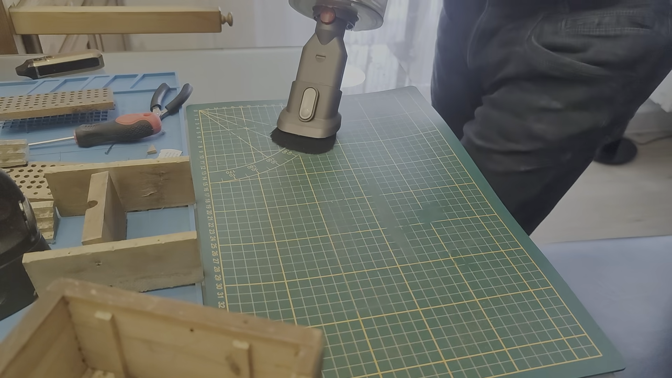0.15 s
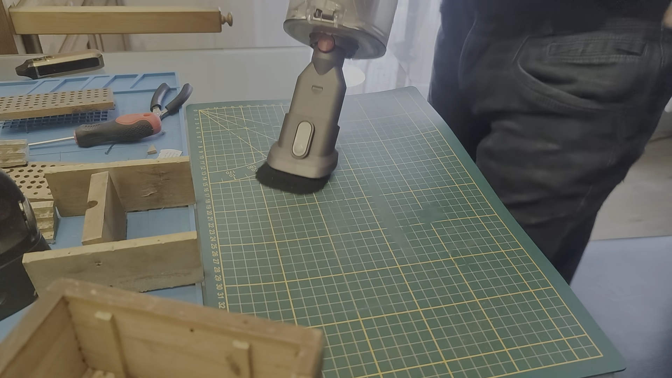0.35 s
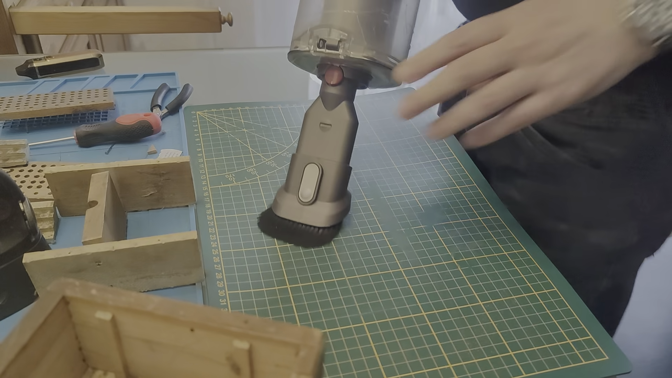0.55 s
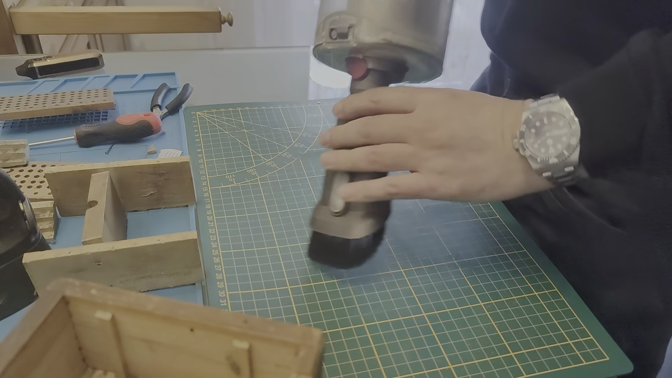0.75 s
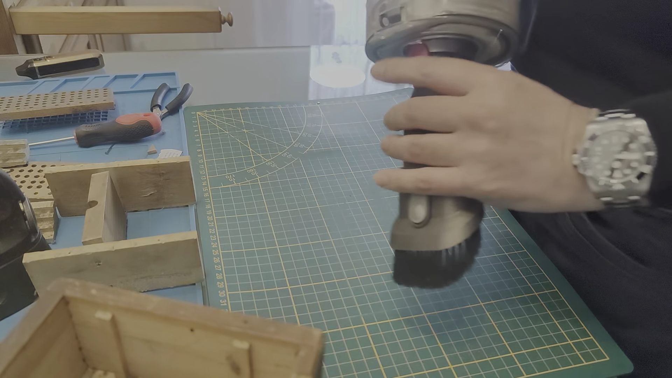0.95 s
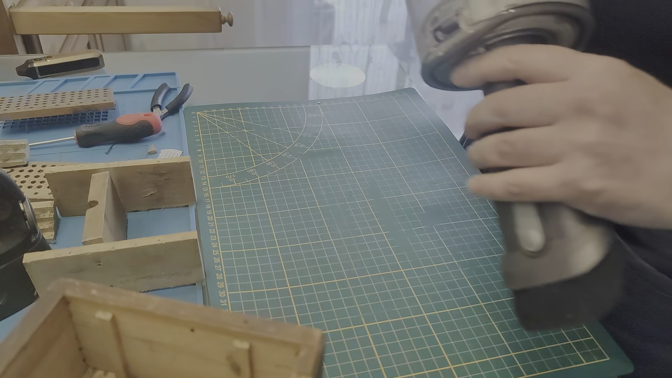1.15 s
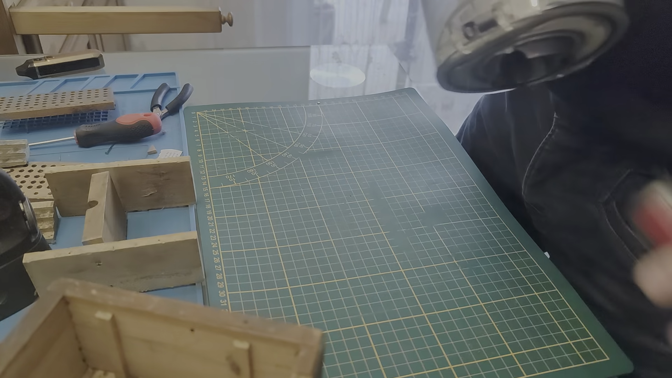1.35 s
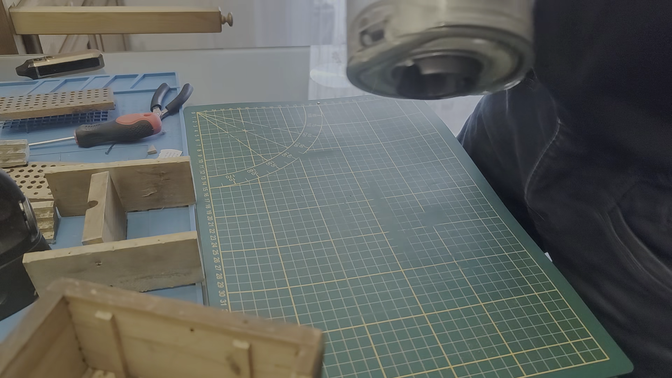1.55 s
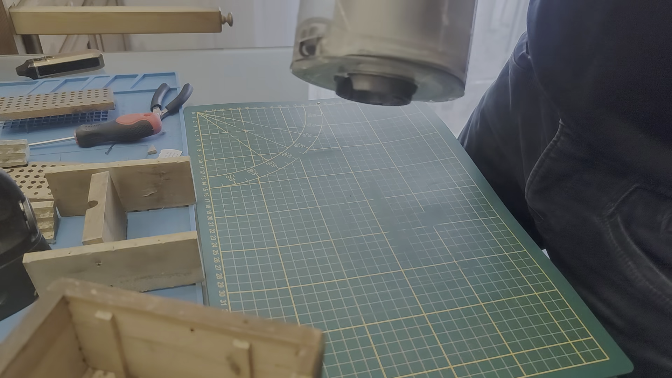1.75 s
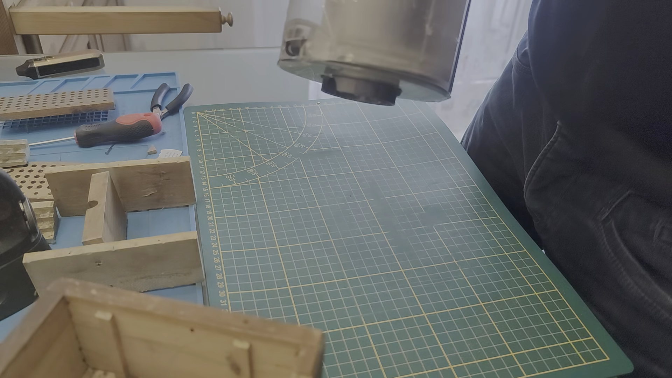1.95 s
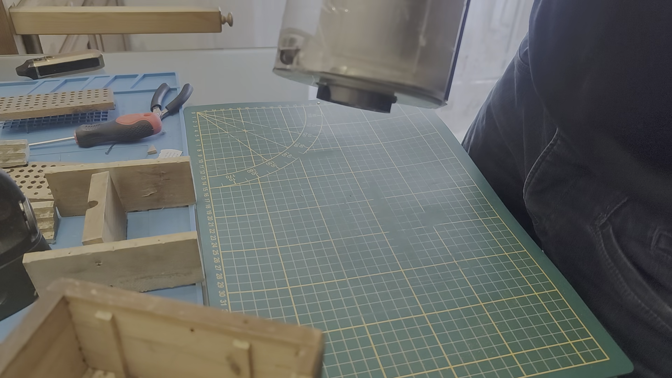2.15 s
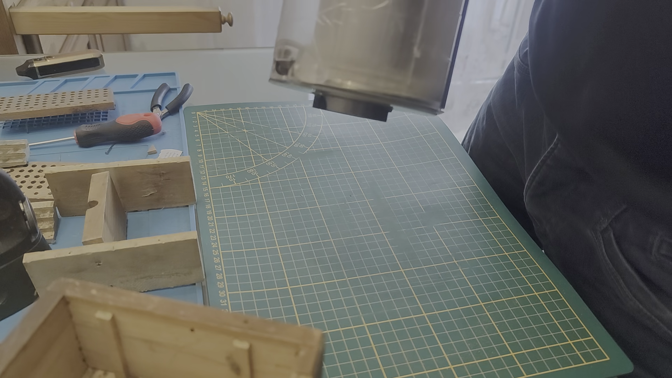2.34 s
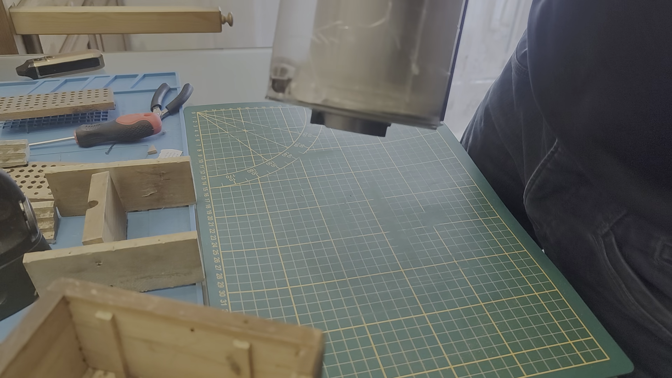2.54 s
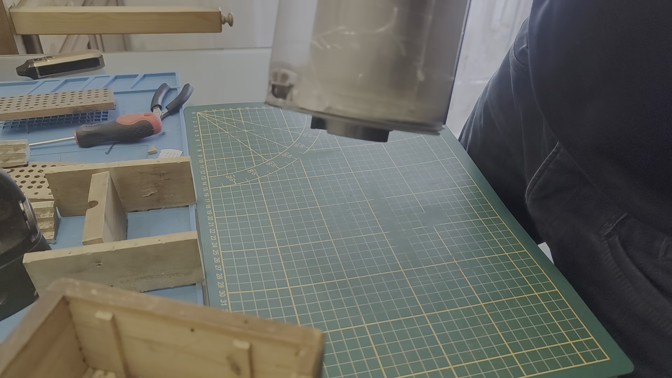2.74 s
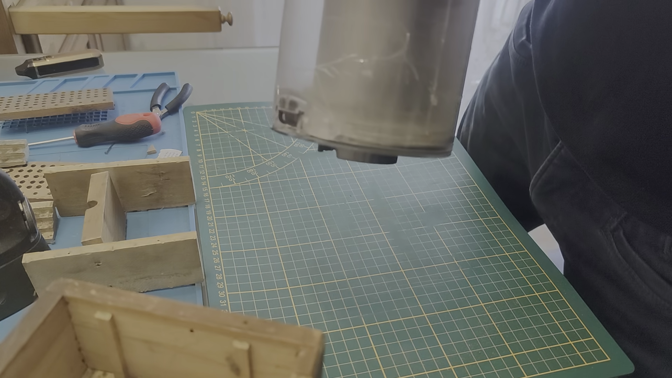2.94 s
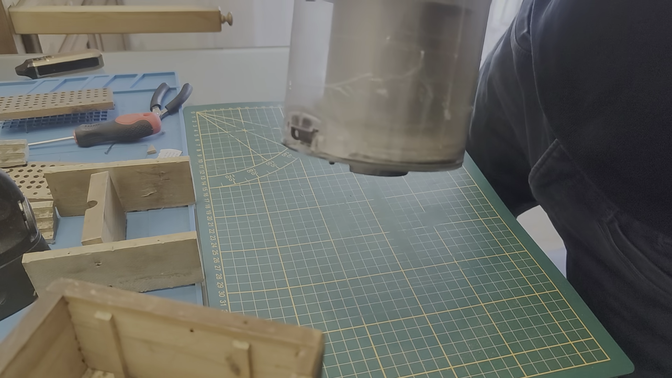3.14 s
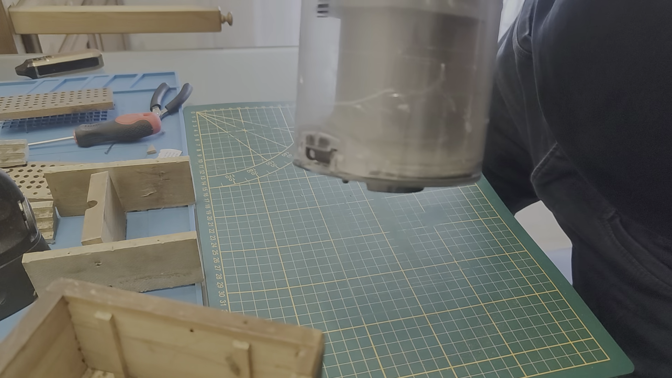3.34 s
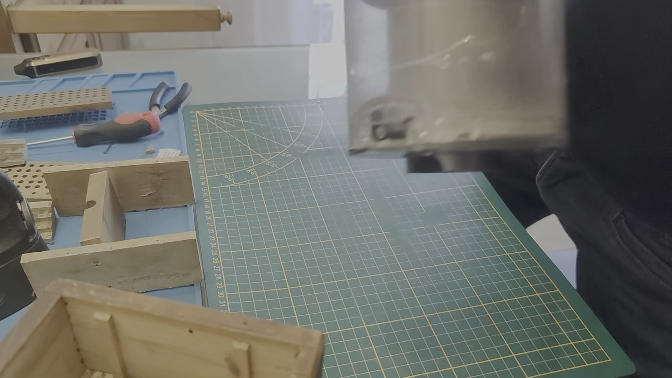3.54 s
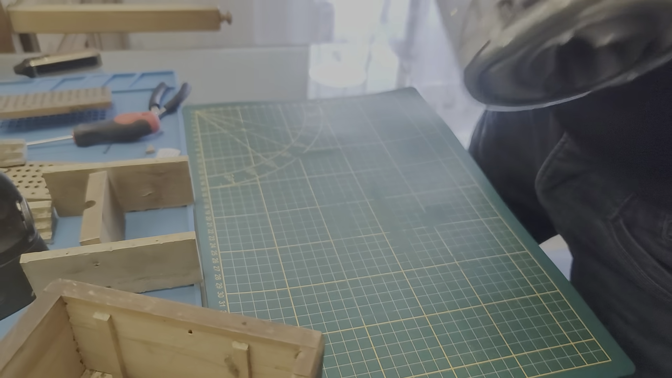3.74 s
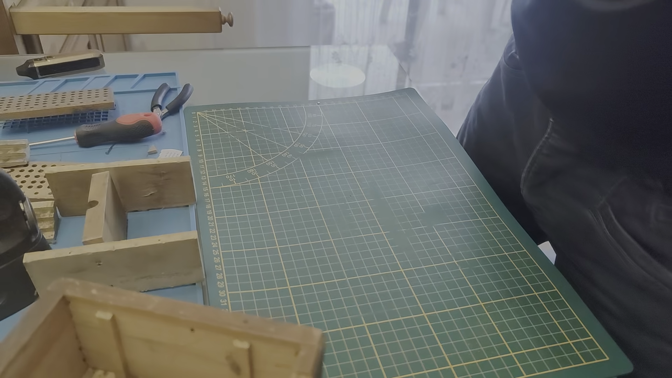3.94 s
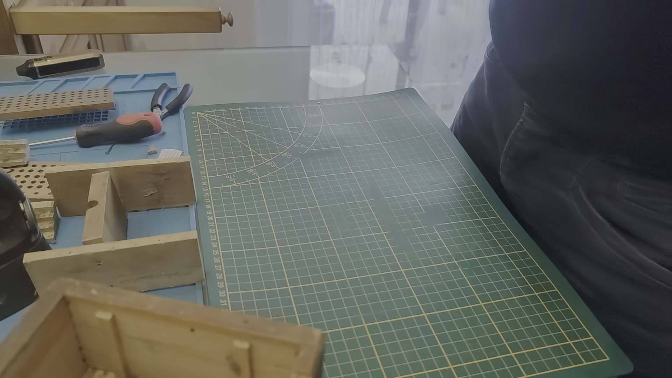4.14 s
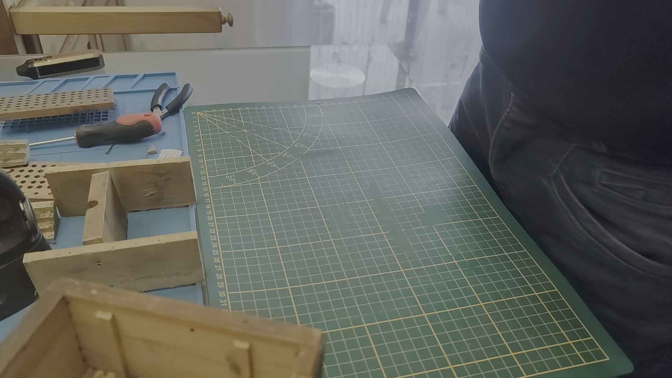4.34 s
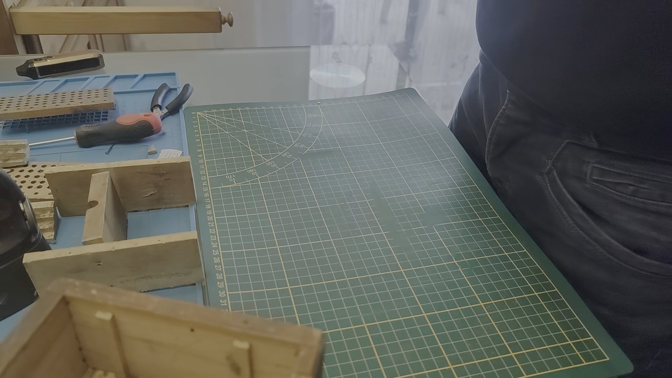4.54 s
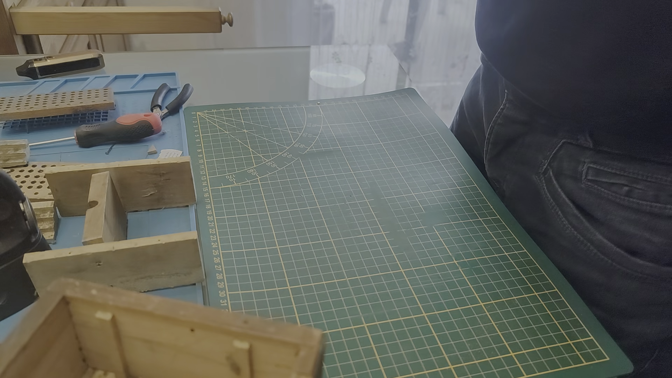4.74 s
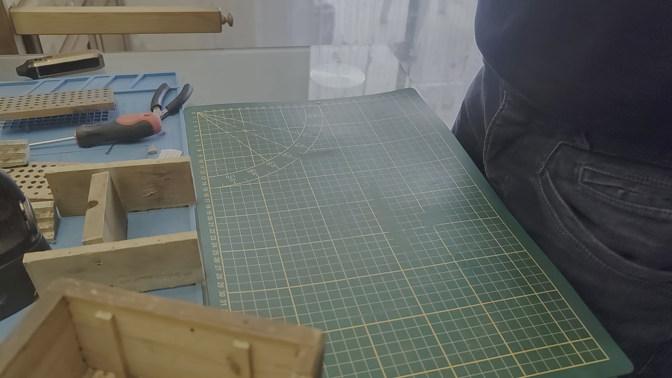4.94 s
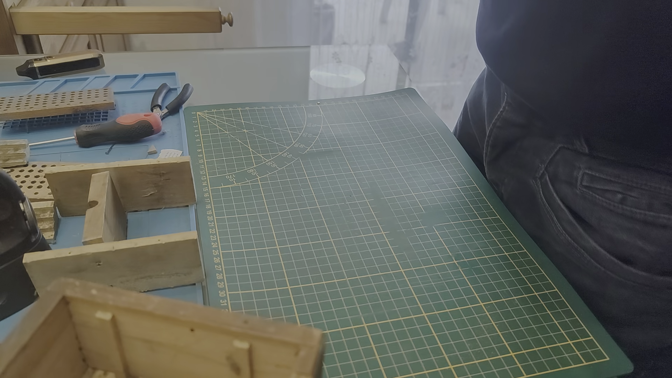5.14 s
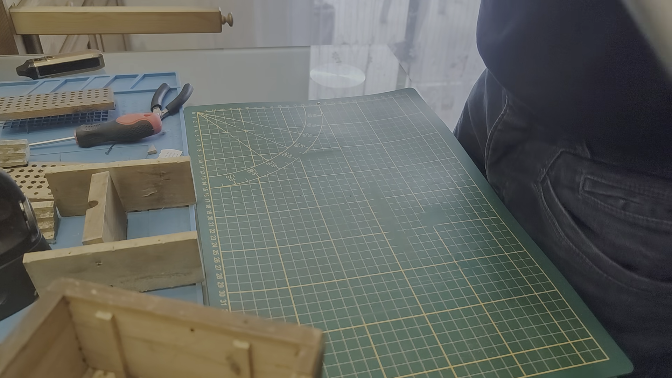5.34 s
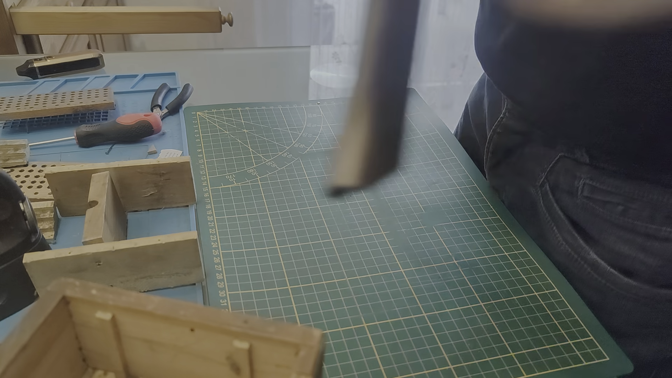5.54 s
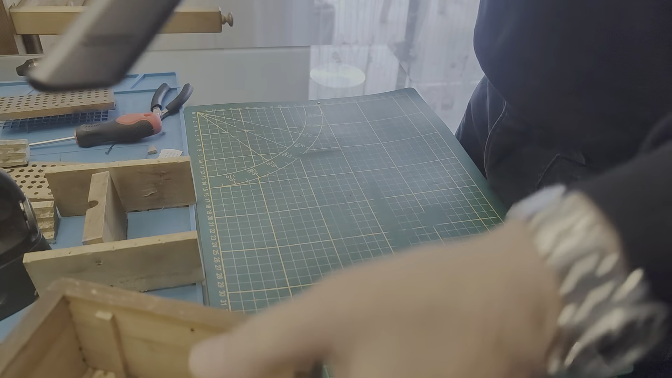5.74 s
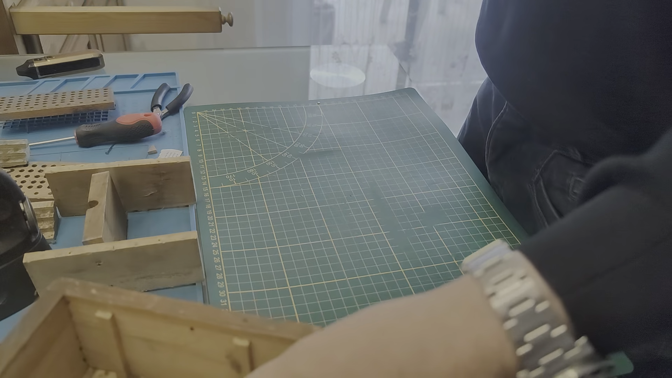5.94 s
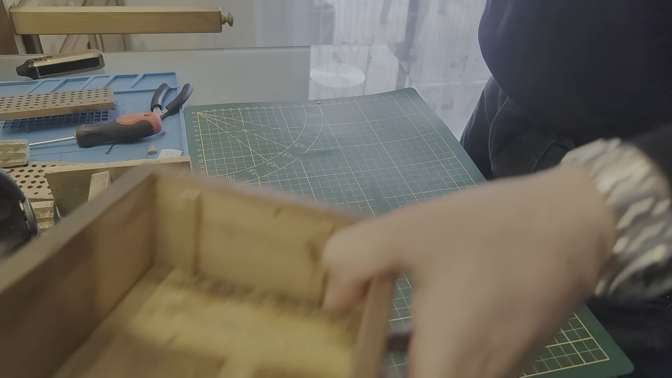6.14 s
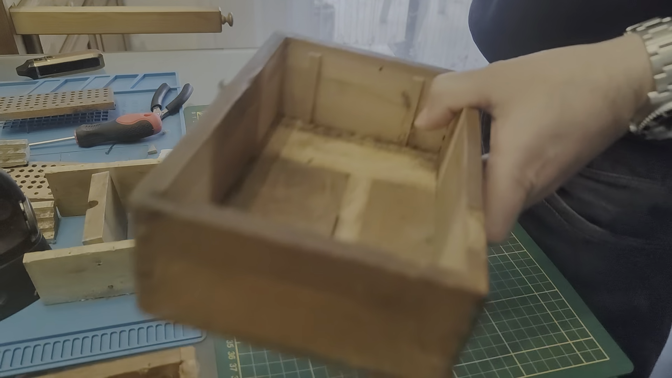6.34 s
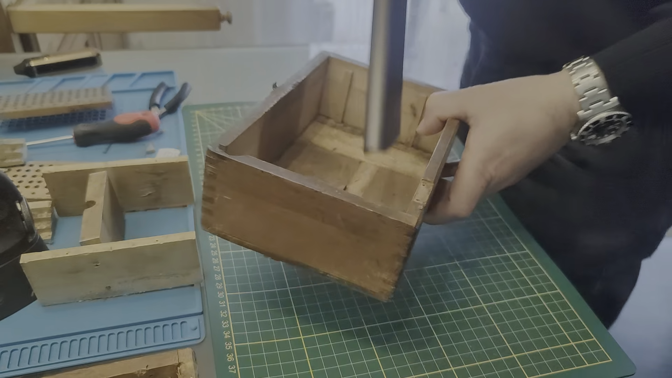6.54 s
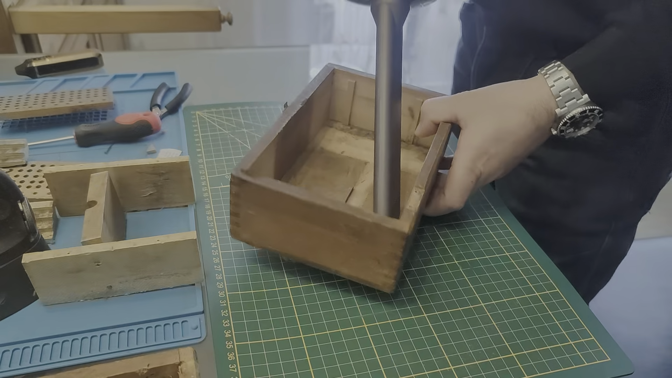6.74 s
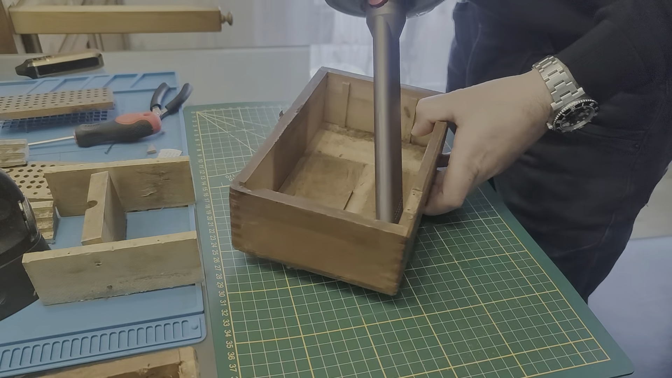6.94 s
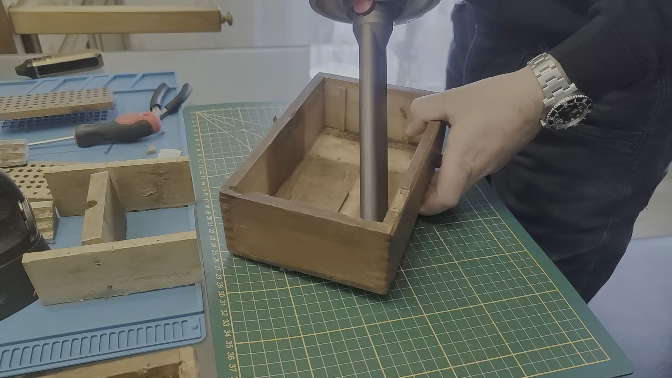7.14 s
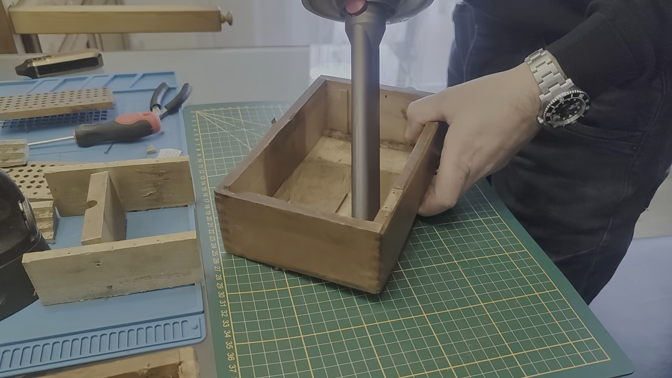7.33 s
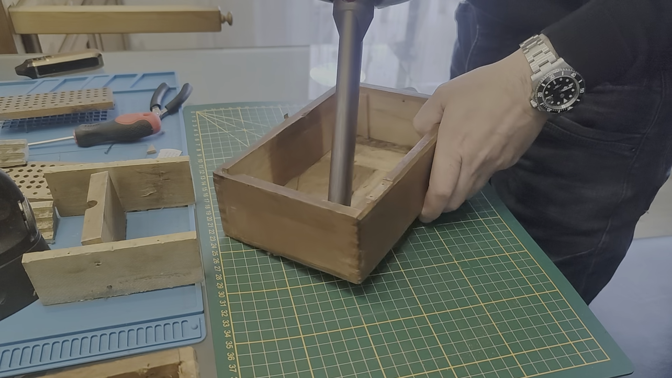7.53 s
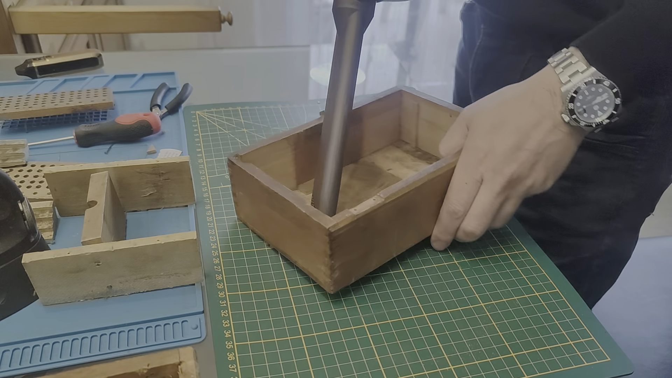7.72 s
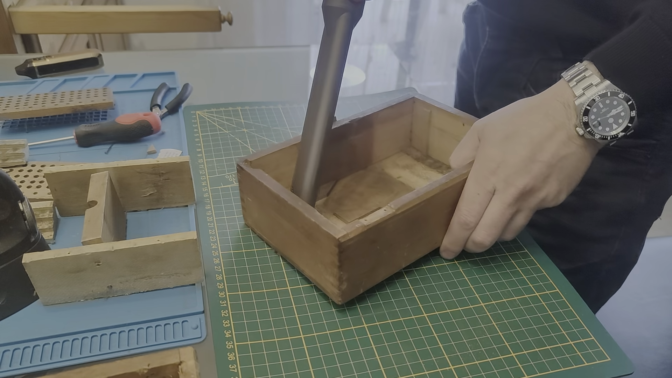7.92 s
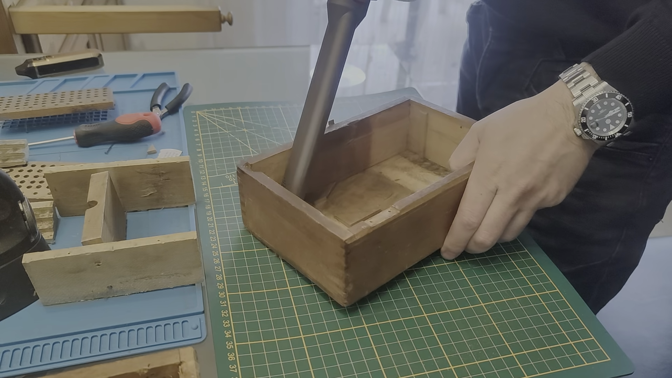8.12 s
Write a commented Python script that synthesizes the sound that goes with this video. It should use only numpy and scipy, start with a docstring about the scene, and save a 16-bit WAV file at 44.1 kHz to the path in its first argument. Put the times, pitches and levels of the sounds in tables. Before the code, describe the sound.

A handheld vacuum runs close by in a small room, with rushing air and a high whine. At about 0.7 seconds it switches off, falling quickly in pitch to a low hum that fades by 2.4 seconds. Hollow plastic knocks and a short scrape come as the brush is pulled off around 1.4 seconds, with louder knocks near 1.9, 2.5 and 3.3 seconds. A small flap rattles, dying away, between 2.6 and 3.2 seconds. From about 4 seconds, light plastic taps, dull bumps and rubbing lead to a loud, sharp snap at 5.3 seconds as a narrow nozzle locks in. Faint rustling and finger contacts follow, then a wooden box lands with a short knock at 6.8 seconds. Immediately the motor spins up with a rising whine, and air rushes and howls through the nozzle until the end, around 8 seconds.

```python
"""Hand vacuum tool change

A cordless hand vacuum runs over a workbench in a small room: air rushes through its duct, its impeller
whines. Switched off, it brakes and coasts with a low hum. The brush is pulled off, the hollow plastic
body is knocked about and a flap rocks. A crevice tool is picked up and snaps in, a wooden box is lifted
and set down, and the motor spins up again, air howling through the tool's slot."""
import sys
import numpy as np
from scipy import signal
from scipy.fft import rfft, irfft
from scipy.io import wavfile
from scipy.ndimage import uniform_filter1d

SR = 44100
rng = np.random.default_rng(int(sys.argv[2]) if len(sys.argv) > 2 else 0)


def put_to_file(sound):
    """Save the sound as 16-bit audio at rate SR, in the file named by the first command-line argument."""
    columns = np.atleast_2d(sound).T  # one column per channel
    safe = np.clip(columns, -1, 1)
    whole_steps = np.round(safe * 32767)
    wavfile.write(sys.argv[1], SR, whole_steps.astype(np.int16))


N = 360738
TIME, RING_TIME = np.arange(N) / SR, np.arange(SR // 2) / SR
HZ, FILTER_HZ = np.fft.rfftfreq(N, 1 / SR), np.fft.rfftfreq(2048, 1 / SR)

OFF_S, ON_S = 0.67, 6.87  # the trigger is released, then pulled again
BRUSH_HZ, CREVICE_HZ, COAST_HZ = 1168.5, 1172.8, 137.7  # shaft speed with each tool, and after braking

# Colour of friction, for rubbing and for the bearings: freq_hz, level_db
FRICTION_COLOUR = [(40, -2), (150, 2.5), (400, 5), (800, 4), (2000, 2.5), (4000, 2), (6500, -3),
                   (14000, -11)]


def amp(db):
    """Decibels to gain."""
    return 10 ** (np.asarray(db) / 20)


def unit_rms(x):
    """Scales to rms 1."""
    return x / np.sqrt(np.mean(x ** 2) + 1e-20)


def curve(points, hz, column=1):
    """One column of a table, joined on a log-frequency axis."""
    table = np.array(points, float)
    return np.interp(np.log(hz + 1), np.log(table[:, 0] + 1), table[:, column])


def automation(rows):
    """The columns of a table as curves in time."""
    times, *columns = np.transpose(rows)
    return [np.interp(TIME, times, column) for column in columns]


def add(mix, start_s, sound):
    """Mixes a sound in at start_s."""
    part = mix[..., round(start_s * SR):][..., :sound.shape[-1]]
    part += sound[..., :part.shape[-1]]


def wander(rate_hz):
    """Smooth random drift of rms 1."""
    return unit_rms(irfft(rfft(rng.standard_normal(N)) / (1 + (HZ / rate_hz) ** 4), N))


def paired(spectra, hz):
    """Makes two spectra alike in the bass, as two close microphone ports hear them."""
    # Likeness of left and right: freq_hz, correlation
    stereo_likeness = [(20, .75), (60, 0.86), (150, 0.86), (300, 0.79), (600, 0.7), (1000, 0.34),
                       (2000, 0.19), (4000, 0.082), (14000, 0)]
    alike = np.clip(curve(stereo_likeness, hz), -1, 1)
    return np.array([spectra[0], alike * spectra[0] + np.sqrt(1 - alike ** 2) * spectra[1]])


def noise(colour_db):
    """Stereo noise of rms 1 in the given colour."""
    return unit_rms(irfft(paired(rfft(rng.standard_normal((2, N))), HZ) * amp(colour_db), N))


def resonances(peaks):
    """Peaks and dips as a dB curve."""
    return sum(db / (1 + (2 * (HZ - hz) / width_hz) ** 2) for hz, width_hz, db in peaks)


def impulse_response(colour_db):
    """Minimum-phase filter for a dB curve."""
    cepstrum = irfft(np.log(amp(colour_db)))
    half = len(cepstrum) // 2
    cepstrum[1:half] *= 2
    cepstrum[half + 1:] = 0
    return irfft(np.exp(rfft(cepstrum)))


def decay(t60):
    """An envelope that falls 60 dB in t60 seconds."""
    return np.exp(-np.log(1000) * RING_TIME / t60)


def mode(hz, t60):
    """One dying sine."""
    return np.sin(2 * np.pi * hz * RING_TIME) * decay(t60)


def ringing(modes):
    """An object's modes, each with the energy of its level."""
    return sum(amp(db) * unit_rms(mode(hz, t60)) for hz, db, t60 in modes) / np.sqrt(len(RING_TIME))


def crack(t60, tick, swell_share=0.023):
    """A sharp tick and a burst of tiny contacts; long scuffs start more softly."""
    count = len(RING_TIME)
    white = rfft(rng.standard_normal((2, count)))
    burst = irfft(paired(white, np.fft.rfftfreq(count, 1 / SR)))
    burst *= (1 - np.exp(-RING_TIME / (swell_share * t60))) * decay(t60)
    burst /= np.linalg.norm(burst[0])
    burst[:, 0] += tick
    return burst / np.hypot(1, tick)


def room_tone():
    """The faint, bass-heavy bed of a still room."""
    # Colour of the bed: freq_hz, level_db
    bed_colour = [(20, 5.5), (90, 13.5), (220, 13), (400, 3.5), (1000, 4.5), (2500, -2.5), (4000, -1),
                  (7000, -9), (14000, -9)]
    return amp(-65) * noise(curve(bed_colour, HZ))


def reverb(x, predelay_s=0.001, build_s=0.00053):
    """The small room's dense tail builds quickly and dies soonest in the top treble."""
    # Decay of the room: freq_hz, t60_s
    decay_times = [(100, 0.3), (300, 0.77), (1000, 0.54), (3000, 0.51), (6000, 0.54), (8000, .38),
                   (14000, 0.23)]
    hz, t, spectra = signal.stft(rng.standard_normal((2, SR)), SR, nperseg=512)
    spectra = paired(spectra, hz[:, None]) * np.exp(-np.log(1000) * t / curve(decay_times, hz)[:, None])
    tail = signal.istft(spectra, SR, nperseg=512)[1][:, :SR]
    tail *= 1 - np.exp(-np.maximum(TIME[:SR] - predelay_s, 0) / build_s)
    return signal.fftconvolve(x, tail / np.linalg.norm(tail[0]), axes=1)[:, :N]


def rubbing(grain_db=2.0):
    """Each stroke swells and fades; its friction catches and slips in small grains."""
    # Strokes of plastic on plastic, hand and sleeve: peak_s, level_db, swell_s, fade_s
    strokes = [ (1.372, -40.5, 0.056, .016), (1.75, -59.5, 0.29, .25), (3.6, -64.5, 0.11, .15),
               (4.05, -61, 0.2, .17), (4.5, -73, .1, .2), (4.93, -53.5, .07, .18),
               (5.204, -43, 0.042, .025), (5.32, -50.5, 0.027, .05), (6.25, -62.5, 0.13, .3),
               (6.55, -60.5, .2, .2), (6.82, -57.5, 0.15, .1)]
    power = np.zeros(N)
    for peak_s, db, swell_s, fade_s in strokes:
        envelope = np.exp(-np.maximum((peak_s - TIME) / swell_s, (TIME - peak_s) / fade_s))
        power += (amp(db) * envelope) ** 2
    return np.sqrt(power) * amp(grain_db * wander(120)) * noise(curve(FRICTION_COLOUR, HZ))


def thuds(t60=0.2, rise_s=0.011, sag=.35, sag_s=0.0063):
    """Soft, low bumps with two beating modes that sag in pitch, plus a low thump and two soft pops."""
    # Dull bumps of handling: start_s, level_db, pitch_hz
    bumps = [(3.319, -39.5, 99), (4.272, -25, 129.6), (4.341, -36.5, 112), (4.405, -44, 103),
             (4.635, -31, 125.5), (4.92, -37, 131), (5.084, -37.5, 123), (5.256, -49.5, 120)]
    # A low thump as the latch overloads the microphone, then two soft low pops:
    # start_s, level_db, length_s
    low_pops = [(5.336, -13.5, 0.0017), (5.53, -41, .0007), (5.546, -24.5, 0.0009)]
    out, t = np.zeros(N), RING_TIME
    for start_s, db, hz in bumps:
        phase = 2 * np.pi * hz * (t + sag * sag_s * (1 - np.exp(-t / sag_s)))
        beating = np.sin(phase) + amp(-7) * np.sin(.78 * phase)
        add(out, start_s, amp(db) * beating * (1 - np.exp(-t / rise_s)) * decay(t60))
    for start_s, db, length_s in low_pops:
        age = t / length_s
        add(out, start_s, amp(db) * (1 - age / 3) * age * np.exp(-age))
    return out


def flap(start_s=2.603, swing_s=.1042, friction_loss=.14, graze_lead_s=.029):
    """A sprung flap rocks between its stops; friction takes the same amount from every swing."""
    # Modes of the flap: pitch_hz, level_db, t60_s
    flap_modes = [(273.5, 0.5, 0.19), (327, 3, 0.18), (867, 3, 0.036), (1020, -3, 0.016), (1250, -9, 0.03),
                  (1850, -16, 0.029)]
    tick = sum(amp(db) * mode(hz, t60) for hz, db, t60 in flap_modes)
    out = np.zeros(N)
    for swing in range(7):
        hit_s = start_s + swing * swing_s
        hit = amp(-47.5) * (1 - swing * friction_loss) * tick
        add(out, hit_s - graze_lead_s, amp(-4.5) * hit)  # grazes one stop just before it hits the other
        add(out, hit_s, hit)
    return out


def blows(hits, modes, gain_db, low_cut_hz, hollow_db, modes_db, pan_db):
    """Each blow cracks and rings the modes; the struck spot adds a hollow tone of its own."""
    # Colour of a blow of ordinary hardness: freq_hz, level_db
    contact_colour = [(250, 4.5), (480, 2.5), (800, -0.5), (1400, -1), (2200, -6), (4500, -13),
                      (9000, -25.5), (14000, -27.5)]
    out, hz = np.zeros((2, N)), FILTER_HZ
    ring = amp(modes_db) * ringing(modes)
    radiation = -10 * np.log10(1 + (low_cut_hz / (hz + 30)) ** 6)  # small things radiate little bass
    bass_shelf = 1 / (1 + (hz / 620) ** 8)
    treble_octaves = np.log2(np.maximum(hz / 1100, 1))
    for start_s, db, bass_db, tilt, crack_t60, hollow_hz in hits:
        damping_db = 11 * np.log10(crack_t60 / .025)  # a clean hit rings most, a scuff damps the modes
        strike = crack(crack_t60, tick=0.1) + amp(-damping_db) * ring
        colour = curve(contact_colour, hz) + bass_db * bass_shelf + tilt * treble_octaves
        hollow = hollow_db / (1 + ((hz / hollow_hz - 1) / 0.13) ** 2)
        response = impulse_response(colour + radiation + hollow)
        add(out, start_s, amp(db) * signal.fftconvolve(strike, response[None], axes=1))
    return amp(gain_db) * amp([[pan_db / 2], [-pan_db / 2]]) * out


def wooden_box():
    """Fingers grip a wooden box, then it lands with a short double knock."""
    # Grip and landing: start_s, level_db, bass_db, tilt_db_per_octave, crack_t60_s, hollow_hz
    hits = [ (6.006, -64.5, 9, 3, 0.059, 297), (6.017, -66, 12, 6.5, 0.12, 310),
            (6.042, -58, 9, 5, 0.13, 430), (6.067, -56, 3.5, 3, 0.12, 660),
            (6.829, -21.5, -13, -3.5, 0.028, 1350), (6.835, -27.5, -7, -2, 0.13, 320)]
    # Modes of the wood: pitch_hz, level_db, t60_s
    modes = [(293, -3.5, 0.12), (656, -9.5, 0.11), (1000, -3, 0.1), (1427, -5, 0.048), (1900, 2, 0.034),
             (2700, -3.5, 0.054)]
    return blows(hits, modes, gain_db=38.5, low_cut_hz=234.5, hollow_db=10, modes_db=-15, pan_db=-.3)


def tool_taps():
    """The crevice tool clatters lightly as it is picked up and lined up."""
    # Taps on the tool: start_s, level_db, bass_db, tilt_db_per_octave, crack_t60_s, hollow_hz
    hits = [ (3.886, -57, -20, 2.5, 0.029, 2400), (3.945, -56.5, -17, 3, 0.04, 1680),
            (4.160, -50.5, 7.5, 3.5, 0.1, 714), (4.181, -47, 1, 3, 0.064, 734),
            (4.194, -57, 1, 3, 0.028, 2000), (4.241, -57, 6.5, 3, 0.045, 710),
            (4.571, -54, 1, 4.5, 0.11, 3860), (4.619, -48, -3.5, 1.5, 0.047, 3700),
            (4.703, -38, -1.5, -4, 0.025, 690), (4.752, -54.5, 9.5, 1.5, 0.023, 720),
            (4.854, -51, 0, 1, .04, 710), (4.89, -53.5, 0.5, -3, 0.1, 715),
            (4.949, -37.5, -3, 5, 0.038, 680), (5.0, -35, -4.5, 4.5, 0.022, 1900),
            (5.033, -36.5, -5.5, 0, 0.045, 600), (5.2, -55, -9, 6.5, 0.033, 3780),
            (5.675, -62.5, 0, 7.5, 0.071, 3800), (5.952, -69, 5, 6.5, .06, 3790)]
    # Modes of the tool: pitch_hz, level_db, t60_s
    modes = [(345, -5.5, 0.11), (646.3, -6, 0.22), (717, 4.5, 0.11), (1840, -10, 0.2), (3120, -15, 0.12),
             (3500, -7.5, 0.15)]
    return blows(hits, modes, gain_db=36.5, low_cut_hz=294, hollow_db=8.5, modes_db=-20, pan_db=-3.4)


def body_knocks():
    """The hollow plastic body rings as the brush comes off and the vacuum is knocked about."""
    # Knocks on the body: start_s, level_db, bass_db, tilt_db_per_octave, crack_t60_s, hollow_hz
    hits = [ (.894, -39.5, -12, 1, 0.06, 2280), (1.113, -56, -7, 0, .03, 3000),
            (1.258, -43, -4, -3, 0.078, 1360), (1.359, -31, -9, 1.9, 0.14, 380),
            (1.445, -42, -26, 0.5, 0.043, 1980), (1.625, -49.5, -1, -9, 0.49, 645),
            (1.864, -22.5, -9.5, 0.05, 0.046, 990), (1.875, -23.5, -5.5, -4, 0.21, 1850),
            (2.218, -56, 1, -3, 0.042, 900), (2.247, -51, -4, -7, 0.11, 914),
            (2.279, -33.5, -10, -0.2, 0.029, 960), (2.285, -48, 14, 2.5, 0.1, 214),
            (2.472, -34.5, -12, -6, 0.28, 960), (2.4965, -22.5, -8, -7, 0.029, 783),
            (2.528, -40, 4.5, -3.5, .05, 1840), (2.549, -43, 0, -9, 0.027, 820),
            (3.317, -34.5, -7, 0, 0.037, 1340), (3.327, -25.5, -10.5, 1.7, 0.15, 420)]
    # Modes of the body: pitch_hz, level_db, t60_s
    modes = [(225.8, -6.5, 0.51), (278.2, -8.5, 0.24), (440, -12.5, 0.37), (817, -20, 0.12),
             (852, -8.5, 0.081), (989, -9, 0.055), (1324, -18, 0.36), (1740, -12, 0.049), (2640, -8.5, 0.1)]
    return blows(hits, modes, gain_db=36, low_cut_hz=210, hollow_db=11, modes_db=-13.5, pan_db=-2.5)


def latch():
    """A stiff plastic catch snaps into its socket."""
    # Scrape, snap and rebound: start_s, level_db, crack_t60_s
    clicks = [(5.3341, -0.5, 0.018), (5.3368, 13.5, 0.013), (5.3405, 12, 0.016)]
    # Colour of the snap: freq_hz, level_db
    snap_colour = [(100, -17.5), (550, -22.5), (1180, -10.5), (1650, 3), (3000, 0), (4700, -3),
                   (6300, -6.5), (9000, -7), (14000, -3)]
    # Modes of the catch: pitch_hz, level_db, t60_s
    catch_modes = [(1780, -18, 0.16), (2066, -12.5, 0.11), (2870, -15, 0.089), (2990, -18.5, 0.06),
                   (3860, -24.5, .15)]
    response = impulse_response(curve(snap_colour, FILTER_HZ))
    out = np.zeros((2, N))
    for start_s, db, t60 in clicks:
        click = signal.fftconvolve(crack(t60, tick=0.14) + ringing(catch_modes), response[None], axes=1)
        add(out, start_s, amp(db) * click / np.linalg.norm(click[0]))
    return out


def coasting_rotor():
    """The unpowered rotor hums while its bearings hiss and buzz on the third harmonic."""
    # The coasting rotor: time_s, pitch_hz, hum_db, hiss_db
    coast = [(.88, 129.5, -56, -55), (.96, 134.7, -42.5, -52.5), (1.04, 136, -38, -55.5),
             (1.11, 146.8, -54, -56.5), (1.3, 154, -53, -61), (1.7, 160.7, -60, -68),
             (1.85, 163, -54.5, -88), (2.4, 163, -79, -89), (3.9, 164.5, -90, -93)]
    hz, hum_db, hiss_db = automation(coast)
    phase = 2 * np.pi * np.cumsum(hz * (1 + 0.0023 * wander(58))) / SR
    buzz_gain = np.hypot(amp(hiss_db - 6.5), amp(-78))  # follows the hiss, then lingers faintly
    hum = np.sqrt(2) * (amp(hum_db) * np.sin(phase) + buzz_gain * np.sin(3 * phase))
    bearings = noise(curve(FRICTION_COLOUR, HZ) + resonances([(3900, 280, 8.3), (5550, 330, 16.4)]))
    gate = uniform_filter1d(1. * (TIME >= coast[0][0]) * (TIME <= coast[-1][0]), size=800)
    return gate * (hum + amp(hiss_db) * bearings)


def shaft(brake_hz_per_s=3900, drain_s=0.066, kick_s=.053, creep_s=.1, fill_s=0.044, surge_s=0.36):
    """Shaft speed in Hz and airflow (1 at full suction): even braking, then a kick and a creep back up."""
    since_off, since_on = np.maximum(TIME - OFF_S, 0), np.maximum(TIME - ON_S, 0)
    slowing = np.maximum(BRUSH_HZ - brake_hz_per_s * since_off, COAST_HZ)
    kick = 1 - np.exp(-(since_on / kick_s) ** 3)
    creep = 1 - .26 * np.exp(-since_on / creep_s)
    hz = np.where(since_on > 0, CREVICE_HZ * kick * creep, slowing)
    braking_s = (BRUSH_HZ - COAST_HZ) / brake_hz_per_s
    drain = np.exp(-np.maximum(since_off - braking_s, 0) / drain_s)
    fill = 1 - np.exp(-(since_on / fill_s) ** 2)
    surge = amp(2.5 * np.exp(-since_on / surge_s))  # the flow overshoots while the bin empties of air
    return hz, hz / BRUSH_HZ * np.where(since_on > 0, fill * surge, drain)


def drifting_echoes(x, echo_db=-13, sway_s=.00006, count=5):
    """Bench, wall and sleeve reflect the moving vacuum, so fine peaks and dips drift through its rush."""
    out = x.copy()
    for delay_s in np.geomspace(.002, .013, count):
        path_s = delay_s * rng.uniform(.85, 1.15) + sway_s * wander(0.69)
        out += amp(echo_db) * np.array([np.interp(TIME - path_s, TIME, side, left=0) for side in x])
    return out / np.sqrt(1 + count * amp(2 * echo_db))


def slot_howl(flow, pitch_hz=2940, width_hz=710, fade_s=0.95):
    """Air squeezed through the narrow tool gives a broad howl that settles as the flow steadies."""
    band = noise(-20 * np.log10(1 + (2 * (HZ - pitch_hz) / width_hz) ** 2))
    settling = (TIME > ON_S) * np.exp(-np.maximum(TIME - ON_S, 0) / fade_s)
    return amp(-33) * flow * settling * band


def air_rush(flow, crossover_hz=5000, gust_db=0.73):
    """Turbulent air in duct and bin; the gusty hiss on top grows faster with flow than the rush below."""
    # Colour of the moving air: freq_hz, level_db
    air_colour = [(30, -27.5), (80, -9.5), (130, -6), (230, 2.5), (550, -3), (950, 5), (1500, 2),
                  (2400, -1.5), (3600, 4), (4600, 3.5), (6300, 2.5), (8500, -7), (14000, -8)]
    # Resonances of duct and bin: centre_hz, width_hz, gain_db
    duct_peaks = [(136, 8.3, 13.5), (1020, 80, 1), (2034, 250, 7), (2700, 600, 4), (3830, 550, 4),
                  (4600, 130, -3.5), (5860, 140, -2), (6260, 40, 5.5), (6580, 35, 3)]
    colour = curve(air_colour, HZ) + resonances(duct_peaks)
    low_share = 1 / (1 + (HZ / crossover_hz) ** 12)
    rush = noise(colour + 10 * np.log10(low_share + 1e-12))
    hiss = noise(colour + 10 * np.log10(1 - low_share + 1e-12))
    return amp(-29.5) * flow ** 0.97 * rush + amp(-25.5 + gust_db * wander(5.3)) * flow ** 1.79 * hiss


def impeller_whine(shaft_hz, flow, waver=0.00077, fade_depth=.22):
    """Shaft harmonics, strongest at the blade rate, swell and fade as the body moves in the room."""
    # Tones of the impeller: shaft_multiple, level_db
    partials = [(1, -23), (5, -20), (9, -4.5), (10, -19.5), (12, -22)]
    # Level ride as the body turns: time_s, blade_tones_db, shaft_note_db
    level_ride = [(.28, 3, 2), (.45, -3, 3), (.75, -1.5, 1), (7.05, -1, -4), (7.22, 2, -1), (7.75, -3, 1),
                  (8.1, -2.5, 12)]
    blade_db, note_db = automation(level_ride)
    slack = np.clip(1 - shaft_hz / BRUSH_HZ, 0, 1)
    wobble = 1 + waver * wander(25) + 0.046 * slack ** 2 * wander(150)  # a slow rotor runs less evenly
    phase = 2 * np.pi * np.cumsum(shaft_hz * wobble) / SR
    whine = np.zeros((2, N))
    for multiple, db in partials:
        gain = amp(db + (note_db if multiple == 1 else blade_db)) * (1 - slack)
        for side in whine:
            fading = 1 + fade_depth * (wander(11) + 1j * wander(13))
            side += gain * unit_rms((fading * np.exp(1j * multiple * phase)).real)
    braking = np.sqrt(slack) * (TIME < ON_S) * (shaft_hz > COAST_HZ)
    whine += amp(-5) * braking * np.sin(phase)  # the shaft note stands out while it brakes
    return amp(-31) * flow ** 0.97 * whine


def motor(flutter_db=0.31):
    """The shaft drives air and whine, both fluttering slightly; the room trails the gliding tones."""
    shaft_hz, flow = shaft()
    rush = air_rush(flow)
    whine = impeller_whine(shaft_hz, flow)
    air = drifting_echoes(rush + slot_howl(flow))
    return (air + whine + amp(-0.5) * reverb(whine)) * amp(flutter_db * wander(60))


def scene():
    """Motor and handling over room tone, each impact layer with its own reverb send."""
    knocks, taps, box, snap = body_knocks(), tool_taps(), wooden_box(), latch()
    soft = flap() + thuds()
    send = amp(-9) * knocks + amp(-7) * taps + amp(-9.5) * box + amp(0.5) * snap + amp(-8.5) * soft
    handling = knocks + taps + box + snap + soft + reverb(send)
    return motor() + coasting_rotor() + rubbing() + handling + room_tone()


def record(dry, ceiling=.8, high_cut_hz=14350):
    """Each microphone port colours its side; the loudest peaks round off and the top treble is cut."""
    # Resonances and notches of the two ports: freq_hz, left_db, right_db
    port_colours = [(60.6, -4, -5), (233, 3.5, 1), (1510, -1.5, -3.5), (4060, -0.5, 0.5), (4500, -5, -1),
                    (5220, -3, 0.5), (6255, 1, 11.5), (6660, 0.5, 8.5), (7864, -2, -7.5), (7860, -16, -25),
                    (8080, -9.5, -13.5), (8630, 1, -12.5), (10660, 1, -13.5), (11000, -2, -1),
                    (13100, 2, -2), (14100, -3.5, -0.5)]
    ports = np.array([impulse_response(curve(port_colours, FILTER_HZ, column)) for column in (1, 2)])
    heard = signal.oaconvolve(dry, ports, axes=1)[:, :N]
    heard /= (1 + (heard / ceiling) ** 6) ** (1 / 6)
    high_cut = signal.firwin(601, high_cut_hz, window=("kaiser", 8), fs=SR)
    return signal.oaconvolve(heard, high_cut[None], "same")


dry = scene()
out = record(dry)
put_to_file(out)
```